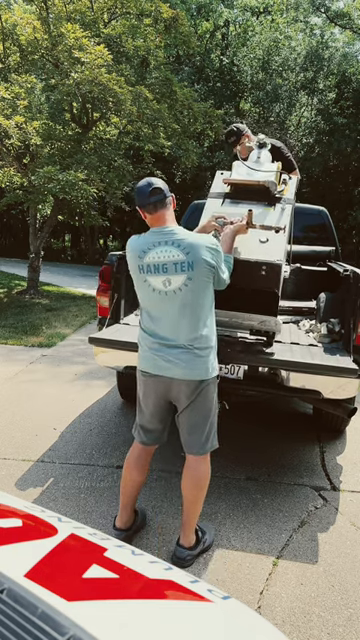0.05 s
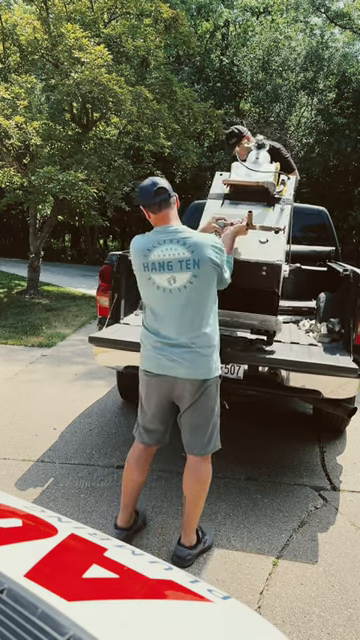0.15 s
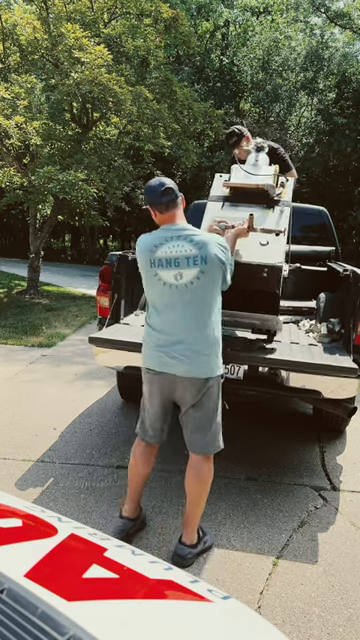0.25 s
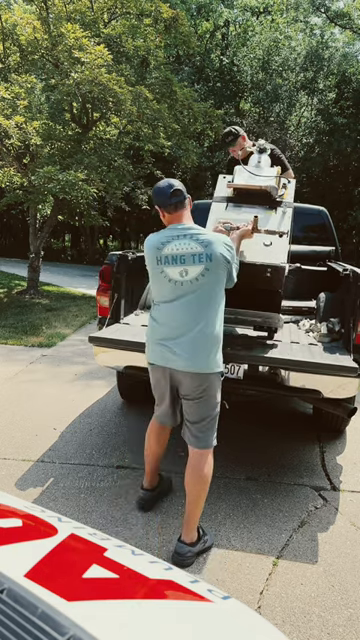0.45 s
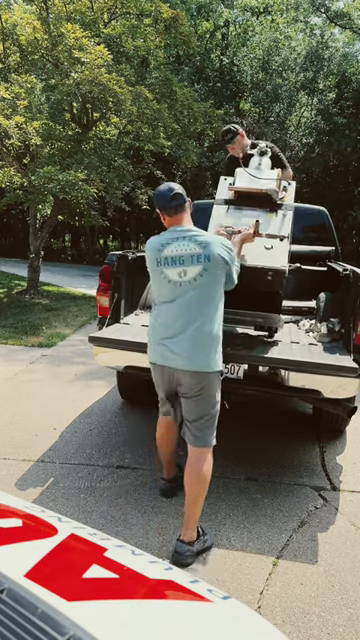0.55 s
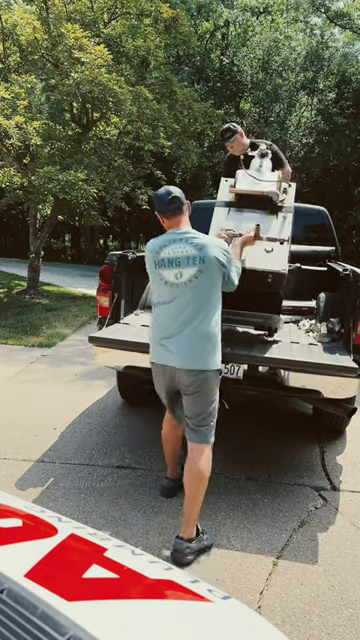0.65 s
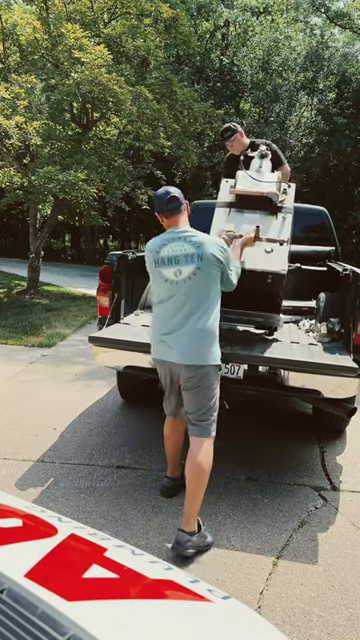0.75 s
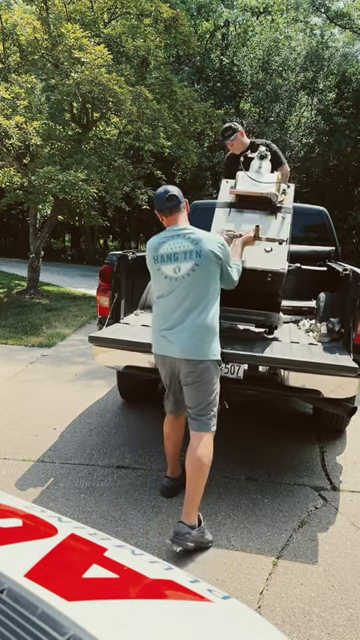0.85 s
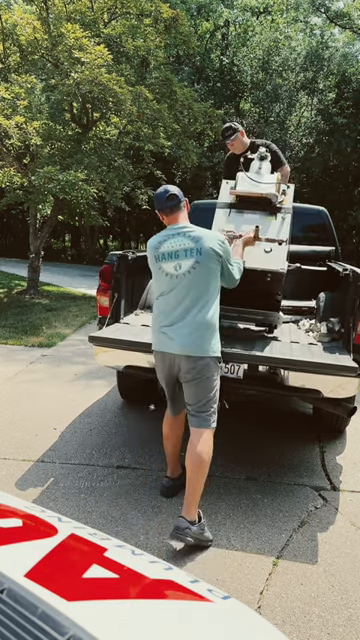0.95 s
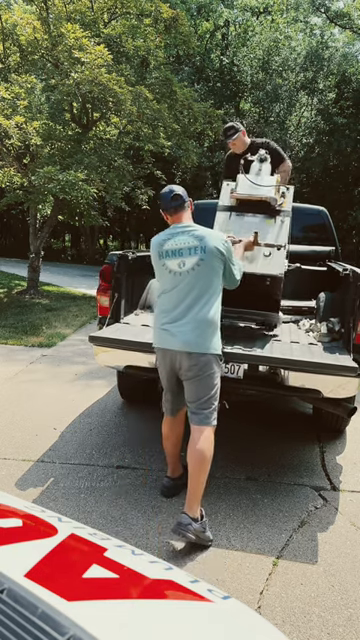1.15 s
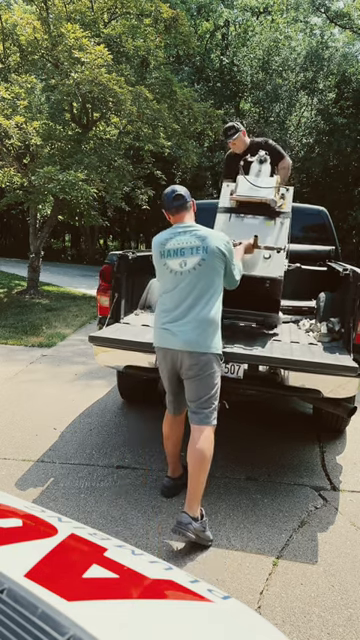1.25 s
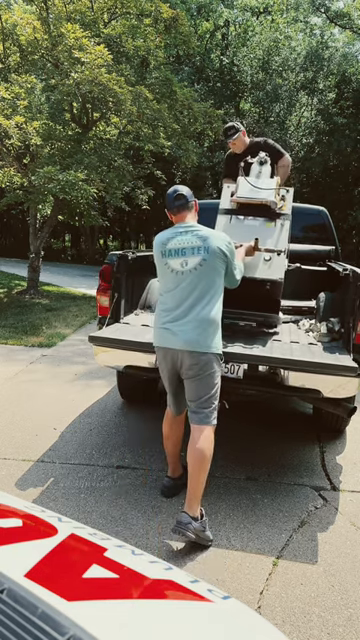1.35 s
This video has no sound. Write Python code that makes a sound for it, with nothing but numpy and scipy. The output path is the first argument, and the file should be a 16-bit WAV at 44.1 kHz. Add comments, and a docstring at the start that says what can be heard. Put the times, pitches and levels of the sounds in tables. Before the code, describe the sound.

A heavy machine lands on a truck bed with a metallic clatter, then shoes scuff softly.

```python
"""Heavy machine set down on a pickup bed

The load lands in a quick run of ever softer, heavier blows that set the bed's panels booming.
Its loose steel parts clack, ring and rattle as it rocks to rest, and the truck groans under the weight.
Shoes step and scuff on gritty concrete; house and trees add a faint tail over a low outdoor rumble."""
import sys
import numpy as np
from scipy import signal
from scipy.fft import rfft, irfft, next_fast_len
from scipy.io import wavfile

SR = 44100
rng = np.random.default_rng(int(sys.argv[2]) if len(sys.argv) > 2 else 0)


def wav_out(sig):
    """Save sig, one row per channel (or a flat mono array), as 16-bit PCM at SR to the path in sys.argv[1]."""
    wavfile.write(sys.argv[1], SR, np.round(np.clip(np.atleast_2d(sig).T, -1, 1) * 32767).astype(np.int16))


N = 61739
TIME = np.arange(N) / SR

# Blows on the bed. Each row: start in seconds, level in dB, contact cut-off in Hz (low is soft).
BED_BLOWS = [(0.205, -21, 2300), (0.2235, -10.5, 1790), (0.2324, -16.5, 1700), (0.2414, -8, 800),
             (.2513, -5, 800), (.2669, -7, 550), (.272, -2.5, 84), (0.3376, -26.5, 480), (0.3732, -25, 745),
             (0.42, -27.5, 1130), (0.4436, -27.5, 400), (0.464, -22, 110), (.527, -22.5, 231),
             (0.6065, -32.5, 734), (0.752, -37, 366), (1.349, -31.5, 189)]
# The boom of the bed's panels. Each row: pitch in Hz, level in dB, t60 in seconds.
PANEL_MODES = [(52.6, -14.5, 0.23), (81.3, -5, 0.18), (102.1, -14.5, 1), (110, -10.5, 0.12),
               (156.9, -8, 0.45), (176.6, -17, 0.59), (256, -1, 0.1), (332, -9.5, 0.26), (357.7, -10, 0.21),
               (411, -7, 0.14), (474, -10, 0.14), (511, -15.5, 0.18), (560, -16, 0.11), (723, -12, 0.17)]
# The bed's crowd of weaker modes. Each row: frequency in Hz, level in dB per Hz, t60 in seconds.
PANEL_WASH = [(59, -18, 0.34), (150, -3, .3), (350, 1, 0.42), (550, 5, 0.163), (666, -0.5, 0.23),
              (1030, 4, 0.17), (1990, 0, 0.11), (6000, -13, 0.099)]
PANEL_MODES_DB, PANEL_WASH_DB = -1.5, -6.5
BUILD_S = 0.00067   # vibration takes this long to spread through a panel

# Loose steel knocking. Each row: start in seconds, level in dB, treble boost and equal bass cut in dB.
STEEL_KNOCKS = [(.207, -38, -10.5), (0.2162, -20.5, -6.5), (0.2624, -16.5, -0.5), (.293, -22, -0.5),
                (.331, -20.5, -1.5), (0.3817, -21, 1.5), (.392, -29, -11), (0.4112, -33, -4.5),
                (0.4429, -36, 0.5), (0.4925, -35, -5.5), (0.5235, -48, -11), (0.5453, -33.5, -1),
                (.572, -38, -3.5), (0.596, -42.5, -8), (0.6219, -58.5, -19.5), (0.7115, -58, 7)]
# The steel's ringing modes. Each row: pitch in Hz, level in dB, t60 in seconds.
STEEL_RING = [(1025, -13, 0.21), (1125, -23, 0.15), (1233, -12, 0.26), (1980, -10.5, 0.074),
              (2333, -9.5, 0.087), (2516, -14, 0.17), (2766, -20, 0.041), (2884, -2.5, 0.079),
              (3400, -15, 0.062), (3650, -15, 0.091), (5650, -3.5, 0.049), (6140, -26, 0.043)]
# The dense clatter of a knock. Each row: frequency in Hz, level in dB per Hz, t60 in seconds.
STEEL_CLATTER = [(300, -0.5, 0.45), (800, -5, 0.15), (1115, -2, 0.25), (1700, -9.5, 0.31),
                 (2420, -0.5, 0.15), (2670, 3.5, 0.037), (3410, -6, 0.18), (4440, -11.5, 0.13),
                 (5580, -1.5, 0.092), (7700, -7, 0.13), (10500, -3, 0.017), (15000, -7, 0.018)]
RING_DB, CLATTER_DB, MODE_SPREAD_DB = -6, -0.5, 3
CRACK_DB, CRACK_T60_S = 1.5, 0.021   # the sharp first snap of a knock
CHATTER_S, CHATTER_DB = .006, -11.5
# The fine rattle's fader while the load rocks. Each row: time in seconds, level in dB.
RATTLE_FADER = [(.2, -36.5), (.225, -22.5), (.3, -30.5), (.42, -48), (.48, -41.5), (.62, -57.5), (.68, -65),
                (.79, -58.5), (.84, -88)]
RATTLE_PER_S, RATTLE_TOP_HZ = 260, 5100

# Shoes on concrete. Each row: start in seconds, level in dB, then attack, hold and t60 in seconds,
# treble tilt in dB per octave.
FOOTSTEPS = [(0.08, -52.5, 0.0036, 0.013, 0.15, -3), (0.146, -44.5, 0.0011, 0.021, 0.14, -10),
             (0.926, -53.5, 0.0073, 0.017, 0.25, -1), (0.975, -51, 0.011, 0.013, 0.18, -1.5),
             (1.041, -57, 0.01, 0.085, 0.3, 0.5), (1.131, -37, 0.0013, 0.0039, 0.16, 0),
             (1.154, -45, 0.028, .04, 0.14, -2), (1.198, -49, 0.0013, 0.0048, 0.13, 4),
             (1.318, -49.5, 0.0022, 0.021, 0.31, -5.5)]
# The tone of a rubbing sole. Each row: frequency in Hz, level in dB per Hz.
SOLE_EQ = [(100, -26), (300, -3.5), (480, -1.5), (700, 0.5), (1180, 2.5), (1900, -3.5), (2600, -3),
           (5000, -11.5), (5950, -4.5), (6800, -12), (10500, -9), (15000, -16.5)]
GRIT_PER_S, GRIT_DB = 830, -3

# The truck's body shifting. Each row: start in seconds, level in dB, attack and t60 in seconds.
TRUCK_GROANS = [(.155, -40.5, 0.0095, .18), (.885, -47.5, 0.021, 0.34), (.97, -44.5, .02, 0.43),
                (1.07, -45.5, 0.013, 0.4), (1.335, -41, 0.017, 0.26)]
# The dark tone of a groan. Each row: frequency in Hz, level in dB per Hz.
GROAN_EQ = [(40, -29), (85, -3), (150, -6), (300, -9.5), (600, -25.5), (1500, -66)]

# Scatter from house and trees. Each row: frequency in Hz, level in dB per Hz, t60 in seconds.
YARD_REVERB = [(59.4, 1, 1), (147, -5, 1.14), (400, -3, 0.95), (990, 8, 0.61), (2900, -2, 0.36),
               (7160, -6.5, 0.58), (15000, -5.5, 0.42)]
YARD_DB, YARD_PREDELAY_S = -21, .02
# The tone of the outdoor rumble. Each row: frequency in Hz, level in dB per Hz.
RUMBLE_EQ = [(25, -28), (50, -7.5), (85, -1.5), (160, -3), (300, -13.5), (600, -26), (1500, -34.5),
             (6000, -40.5), (10000, -47), (16000, -47)]
# The rumble's fader. Each row: time in seconds, level in dB.
RUMBLE_FADER = [(0, -57.5), (.3, -34), (.9, -50), (1.4, -47.5)]
# The stereo image by frequency. Each row: frequency in Hz, left's phase lead in radians,
# left over right in dB, diffuse side signal in dB.
STEREO_IMAGE = [(80, 0, .3, -32), (280, -.03, 2.2, -25), (580, -.62, -.6, -17), (1200, 0, -1.7, -16),
                (2600, 0, -.7, -15), (5200, .1, 0, -9), (7500, -1.45, 0, -11), (10700, -3.05, 0, -20),
                (13400, -3.2, 0, -20), (15300, -4.3, 0, -14)]
CUTOFF_HZ = 15900


def truck_bed():
    """Each blow is a soft push that sets the bed's panels booming."""
    pushes = np.array([from_db(db) * soften(delayed(TIME == 0, s), hz) for s, db, hz in BED_BLOWS])
    push = pushes.sum(axis=0)
    boom = sum((-1) ** k * from_db(db) * ring(push, hz, t60)
               for k, (hz, db, t60) in enumerate(PANEL_MODES))
    return from_db(PANEL_MODES_DB) * boom + from_db(PANEL_WASH_DB) * struck_body(pushes, PANEL_WASH)


def loose_steel():
    """Knocks and rattle make the loose parts crack, clatter and ring."""
    knocks = np.array([rattle()] + [knock(*row) for row in STEEL_KNOCKS])
    rings = 0
    for hz, db, t60 in STEEL_RING:
        # each knock meets the mode with a different strength
        strengths = from_db(MODE_SPREAD_DB * rng.standard_normal(len(knocks)))
        rings += from_db(db) * ring(strengths @ knocks, hz, t60)
    snap = coloured(rng.standard_normal(N), STEEL_CLATTER) * envelope(0, CRACK_T60_S)
    cracks = signal.fftconvolve(knocks.sum(axis=0), snap)[:N]
    clatter = struck_body(knocks, STEEL_CLATTER)
    return from_db(RING_DB) * rings + from_db(CRACK_DB) * cracks + from_db(CLATTER_DB) * clatter


def knock(s, db, tilt_db):
    """One steel contact and a brief chatter of smaller rebounds."""
    clicks = np.zeros(N)
    rebounds = from_db(CHATTER_DB) * rng.choice([-1, 1], size=4)
    clicks[(rng.uniform(.1, 1, size=4) * CHATTER_S * SR).astype(int)] = rebounds
    clicks[0] = 1
    dull = signal.lfilter(*signal.butter(1, 3000, fs=SR), clicks + 1e-18)
    bright = clicks - dull
    return from_db(db) * delayed(dull * from_db(-tilt_db) + bright * from_db(tilt_db), s)


def rattle():
    """Small random contacts between the loose parts."""
    contacts = (rng.random(N) < RATTLE_PER_S / SR) * rng.choice([-1, 1], N) * rng.uniform(0.44, 1, N)
    level = from_db(np.interp(TIME, *np.transpose(RATTLE_FADER), left=-np.inf, right=-np.inf))
    return signal.lfilter(*signal.butter(1, RATTLE_TOP_HZ, fs=SR), contacts * level + 1e-18)


def struck_body(pushes, table, spots=3):
    """Successive blows take turns on a few spots, each with its own dense ring."""
    return sum(signal.fftconvolve(pushes[spot::spots].sum(axis=0), dense_ring(table))[:N]
               for spot in range(spots))


def dense_ring(table):
    """Countless modes struck at once: third-octave noise bands, each dying at its own rate."""
    edges = 40 * 2 ** (np.arange(27) / 3)
    white = rng.standard_normal((2, N))
    out, power = 0, 0
    for k, (low, high) in enumerate(zip(edges, edges[1:])):
        hz = np.sqrt(low * high)
        fall = envelope(BUILD_S, t60=at_hz(table, hz, column=2))
        bandpass = signal.butter(2, [low, high], "band", fs=SR, output="sos")
        band = signal.sosfilt(bandpass, white[k % 2] * fall + 1e-18)
        gain = from_db(at_hz(table, hz)) * np.sqrt(high - low)
        out += gain * rms_one(band) * np.sqrt(np.mean(fall ** 2))
        power += gain ** 2
    return out / np.sqrt(power)


def ring(clicks, hz, t60):
    """One mode: a unit click sets a sine of height 1 ringing down."""
    decay = np.exp(-np.log(1000) / (t60 * SR))
    turn = 2 * np.pi * hz / SR
    return signal.lfilter([0, np.sin(turn)], [1, -2 * decay * np.cos(turn), decay ** 2], clicks + 1e-18)


def shoes():
    """Soles slap and drag over gritty concrete."""
    out = 0
    for s, db, attack, hold, t60, tilt_db in FOOTSTEPS:
        grit = rms_one((rng.random(N) < GRIT_PER_S / SR) * rng.standard_normal(N))
        rub = coloured(rng.standard_normal(N) + from_db(GRIT_DB) * grit, SOLE_EQ, tilt_db)
        out += from_db(db) * delayed(rub * envelope(attack, t60, hold), s)
    return out


def truck_groans():
    """Dull swells of noise as the weight shifts on the truck."""
    out = 0
    for s, db, attack, t60 in TRUCK_GROANS:
        groan = coloured(rng.standard_normal(N), GROAN_EQ) * envelope(attack, t60)
        out += from_db(db) * delayed(groan, s)
    return out


def yard_reverb(x):
    """House and trees scatter back a faint, diffuse tail."""
    tail = delayed(dense_ring(YARD_REVERB), YARD_PREDELAY_S)
    return from_db(YARD_DB) * signal.fftconvolve(x, tail / np.sqrt(np.sum(tail ** 2)))[:N]


def outdoor_rumble():
    """Low ambience that swells around the landing and sinks back."""
    level = from_db(np.interp(TIME, *np.transpose(RUMBLE_FADER)))
    return level * coloured(rng.standard_normal(N), RUMBLE_EQ)


def stereo_spread(x):
    """Left and right differ in phase and level by frequency; at 11-13 kHz they are almost opposite."""
    size = next_fast_len(2 * N)
    hz = np.arange(size // 2 + 1) * SR / size
    lead, balance_db, diffuse_db = (at_hz(STEREO_IMAGE, hz, column) for column in (1, 2, 3))
    smear = rng.standard_normal(N) * envelope(attack=.001, t60=.12)
    diffuse = rfft(smear / np.sqrt(np.sum(smear ** 2)), size) * from_db(diffuse_db)
    side = np.array([[1], [-1]])   # left, right
    response = np.exp(.5j * side * lead) * from_db(.5 * side * balance_db) * (1 + side * diffuse)
    return irfft(rfft(x, size) * response, size)[:, :N]


def envelope(attack, t60, hold=0):
    """A rounded rise, a hold and an exponential fall."""
    rise = 1 - np.exp(-TIME / max(attack, 1e-5))
    return rise * np.exp(-np.log(1000) * np.maximum(TIME - hold, 0) / t60)


def coloured(x, eq, tilt_db=0):
    """Shape steady noise with an EQ curve and a tilt per octave above 300 Hz; rms 1."""
    size = next_fast_len(N)
    hz = np.arange(size // 2 + 1) * SR / size
    gain = from_db(at_hz(eq, hz) + tilt_db * np.log2(np.maximum(hz, 300)))
    return rms_one(irfft(rfft(x, size) * gain, size)[:N])


def soften(x, hz):
    """Two-pole low-pass."""
    return signal.sosfilt(signal.butter(2, hz, fs=SR, output="sos"), x + 1e-18)


def delayed(x, s):
    """The sound x, starting at s seconds."""
    return np.concatenate([np.zeros(int(s * SR)), x])[:N]


def at_hz(points, hz, column=1):
    """Read one column of a table on a log-frequency axis."""
    table = np.array(points)
    return np.interp(np.log(np.maximum(hz, 1)), np.log(table[:, 0]), table[:, column])


def from_db(db):
    """Decibels to gain."""
    return 10 ** (np.asarray(db) / 20)


def rms_one(x):
    """Scale to an rms of 1."""
    return x / np.sqrt(np.mean(x ** 2) + 1e-20)


def scene():
    """Load, truck and shoes up front, yard and rumble behind, spread to stereo."""
    near = truck_bed() + loose_steel() + shoes() + truck_groans()
    return stereo_spread(near + yard_reverb(near) + outdoor_rumble())


def record(dry):
    """Soft clipping rounds the highest peaks; a steep low-pass trims the top."""
    rounded = dry / (1 + dry ** 4) ** .25
    return signal.sosfilt(signal.ellip(10, .1, 80, CUTOFF_HZ, fs=SR, output="sos"), rounded)


dry = scene()
out = record(dry)
wav_out(out)
```